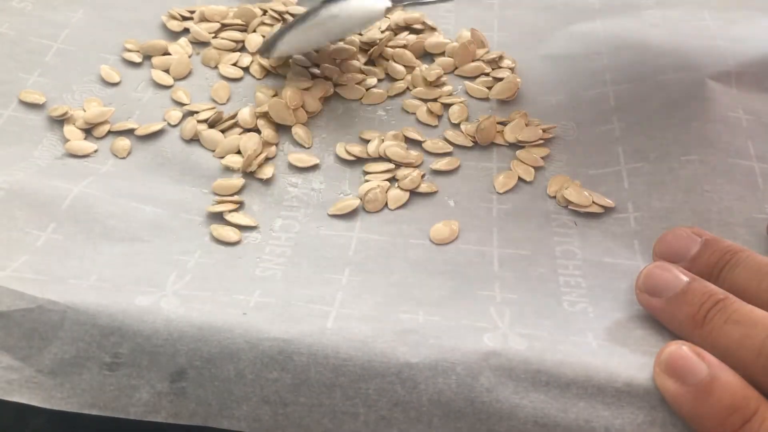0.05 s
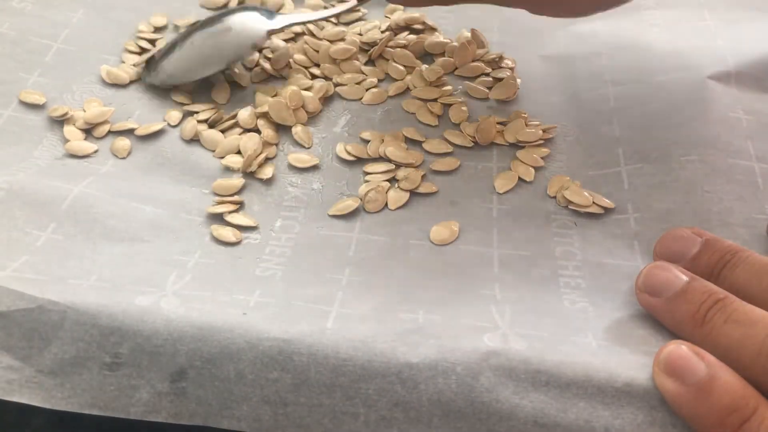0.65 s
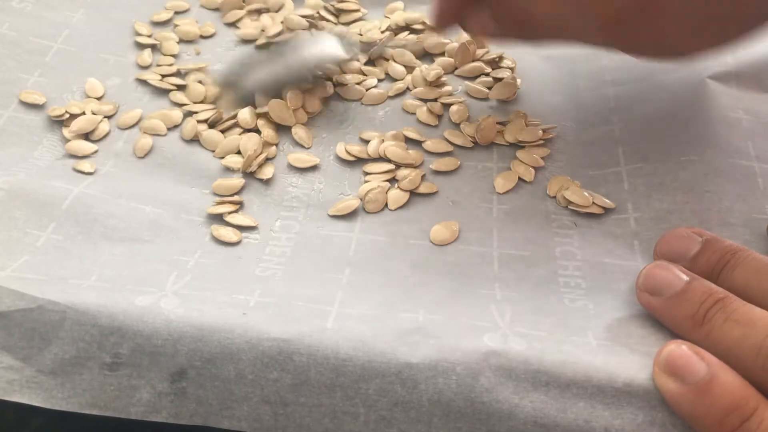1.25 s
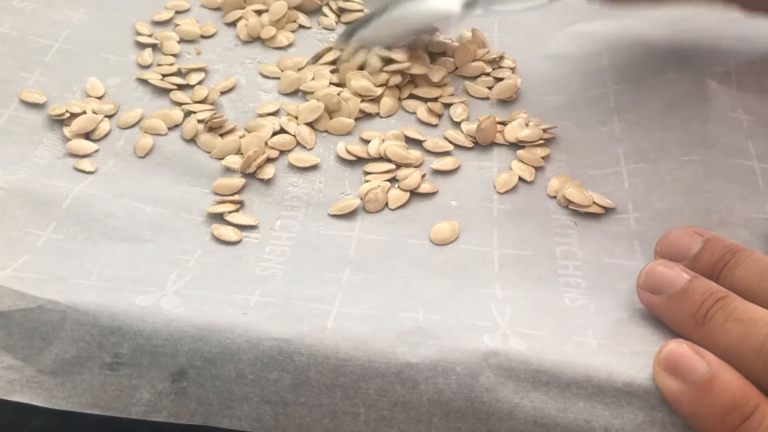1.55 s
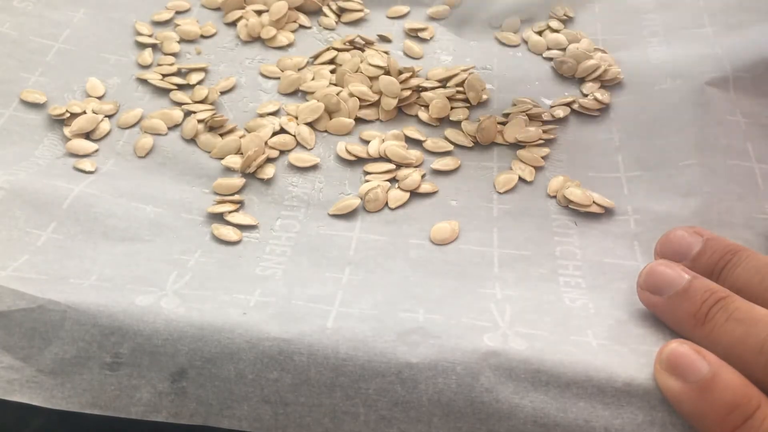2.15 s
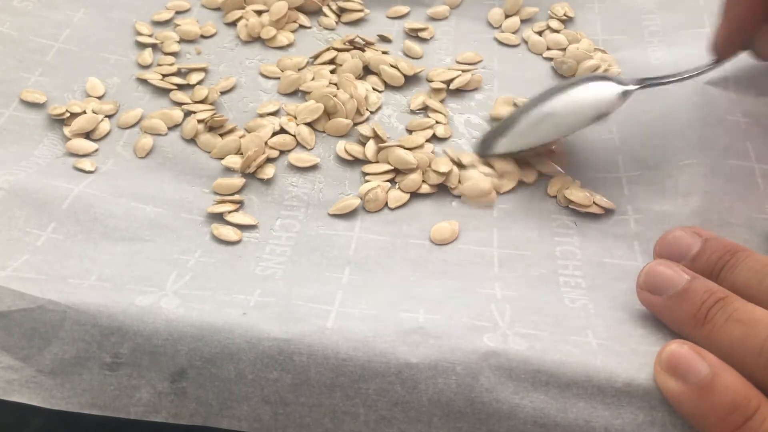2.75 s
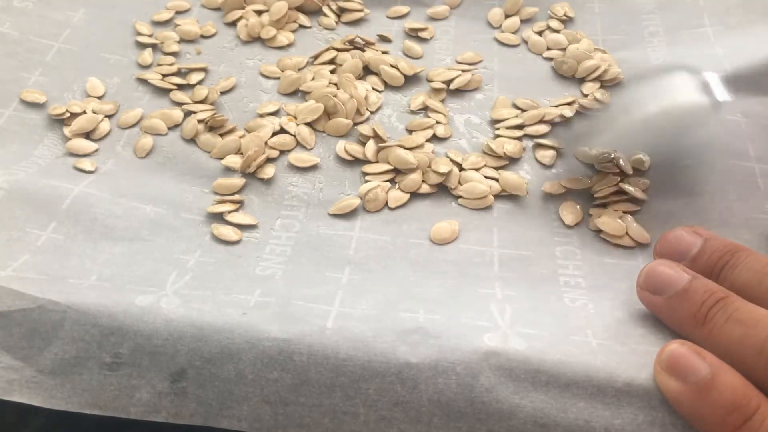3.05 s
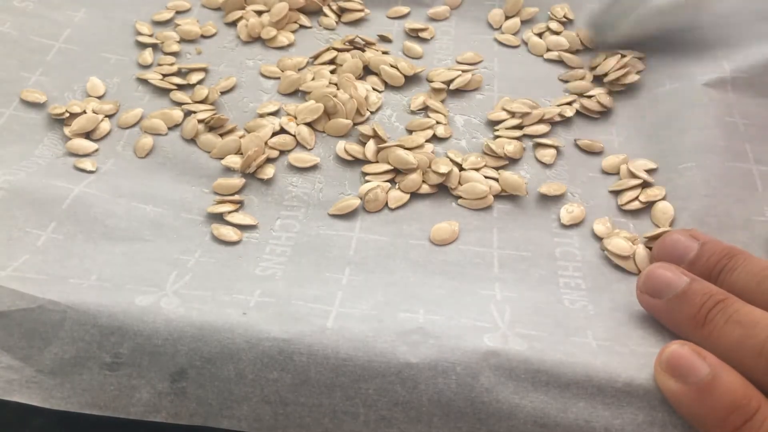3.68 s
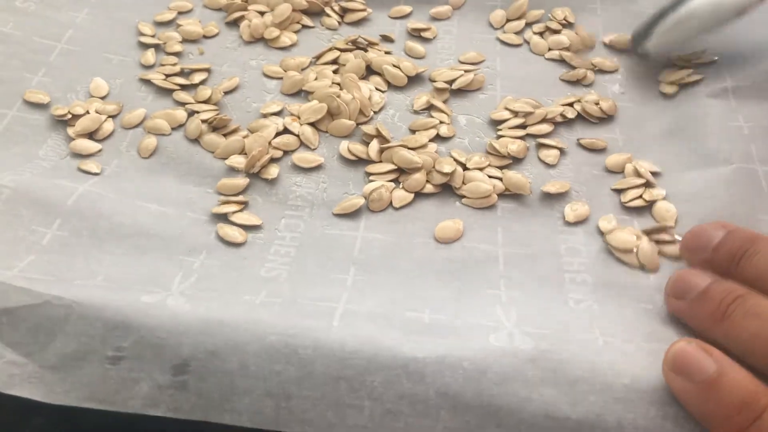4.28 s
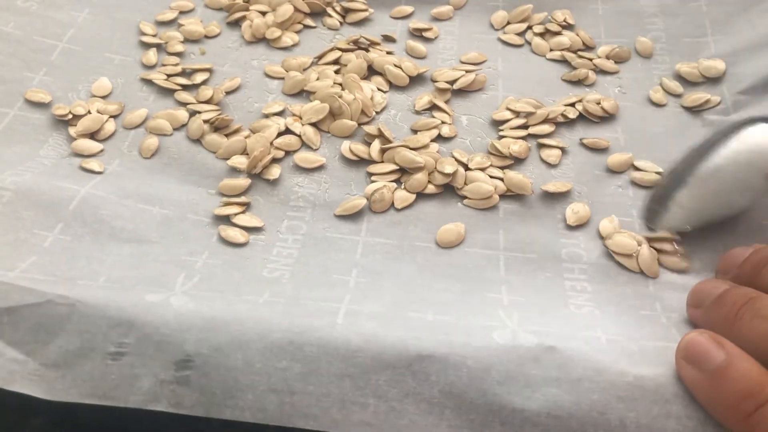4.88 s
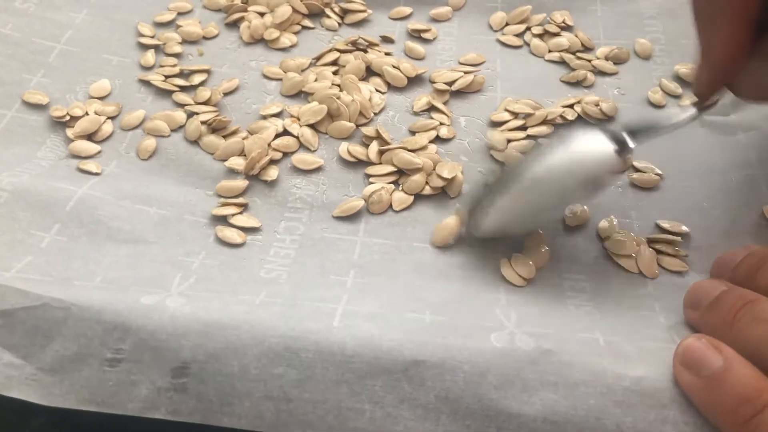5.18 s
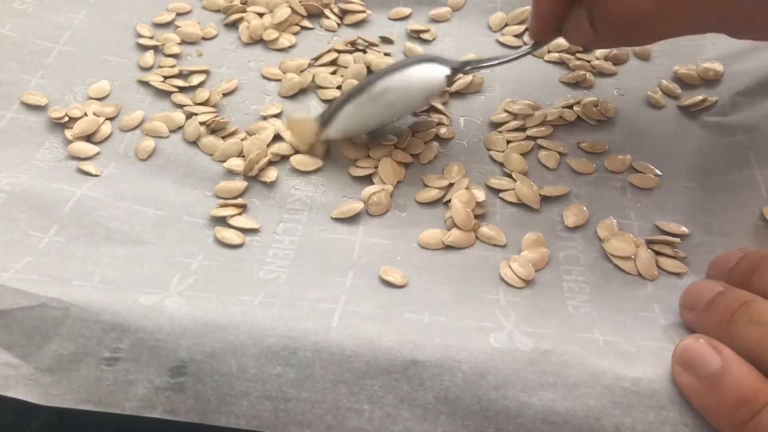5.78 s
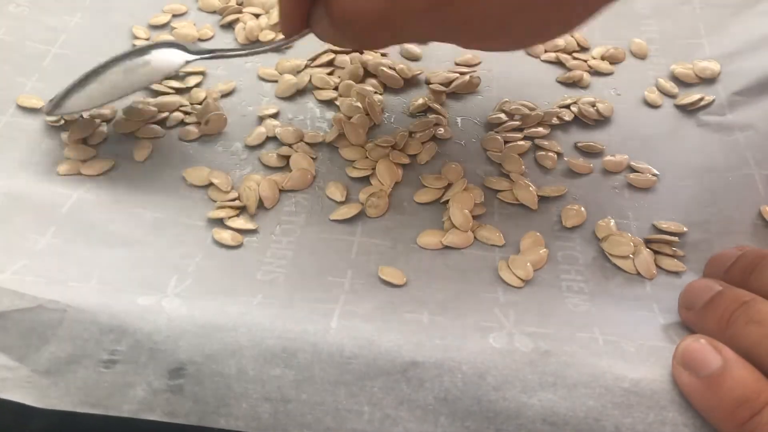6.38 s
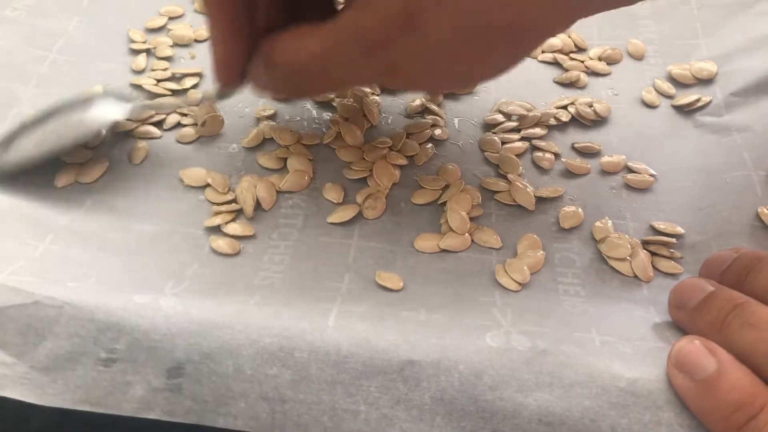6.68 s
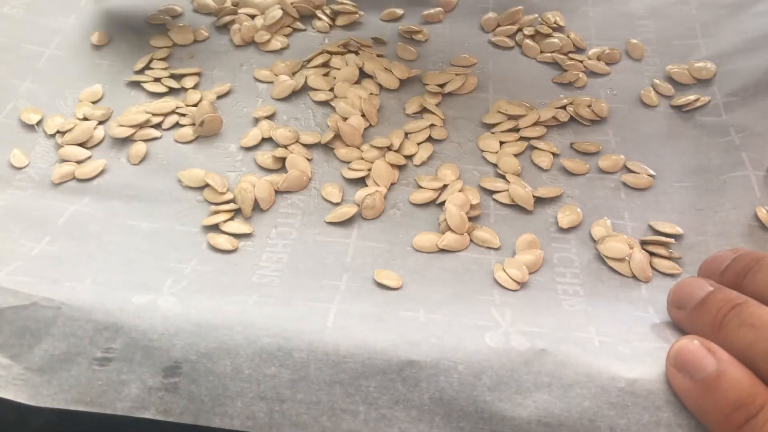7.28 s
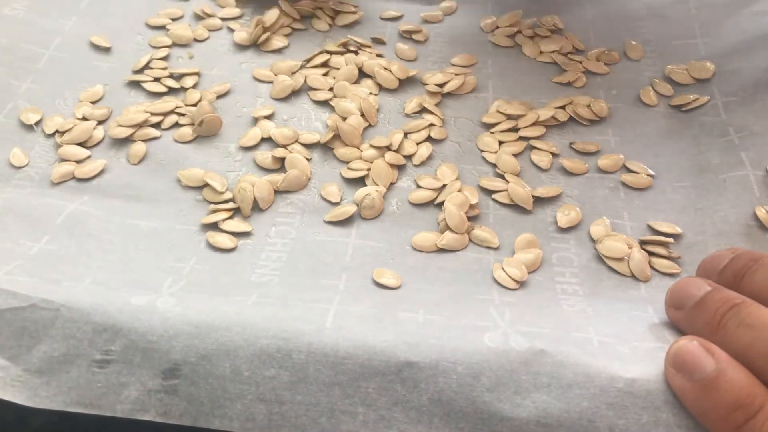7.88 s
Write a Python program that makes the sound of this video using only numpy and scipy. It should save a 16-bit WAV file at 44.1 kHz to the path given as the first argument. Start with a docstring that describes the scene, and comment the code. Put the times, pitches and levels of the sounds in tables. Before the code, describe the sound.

A steel spoon spreads pumpkin seeds over a paper-lined metal pan, with irregular clacking knocks, dry rattles and rustles.

```python
"""A small kitchen, close on a metal pan lined with baking paper: a steel spoon spreads pumpkin seeds.
Short strokes set the seeds rattling on the pan and rustling over the paper; single husks snap, the
steel squeaks, and faint, thin, high pings sound now and then. Up front the spoon knocks on the pan
through the seeds, each knock a burst of tiny contacts that clacks, crackles and rings the damped metal.
Underneath sit soft bumps of the pan on the counter, the room's reverb and an appliance's faint hum."""
import sys
import numpy as np
from scipy import signal
from scipy.fft import rfft, irfft, next_fast_len
from scipy.io import wavfile
from scipy.ndimage import map_coordinates

SR = 44100
rng = np.random.default_rng(int(sys.argv[2]) if len(sys.argv) > 2 else 0)


def digitize_waveform(pressure):
    """Quantize a signal to 16-bit integers and store it at the path in sys.argv[1].

    Rows of a 2-D input are taken as channels; values are limited to [-1, 1].
    """
    field = np.atleast_2d(pressure).T
    bounded = np.clip(field, -1, 1)
    quanta = np.round(bounded * 32767).astype(np.int16)
    wavfile.write(sys.argv[1], SR, quanta)


N = 354563

# The appliance's hum. Each row: frequency in Hz, rms level in dB.
HUM_PARTIALS = [(240.4, -58), (120.2, -71)]
# The kitchen's reverb. Each row: frequency in Hz, time to fall 60 dB (t60) in seconds.
ROOM_DECAY = [(150, 0.34), (500, 0.6), (1400, 0.97), (3500, 0.6), (7000, 0.67), (14000, 0.44)]

# Tone colours. Each row: frequency in Hz, relative level in dB.
AIR_EQ = [(25, -29), (50, -10), (80, -6.5), (120, -13), (160, -13.5), (230, -6.5), (300, -9), (480, -17.5),
          (700, -17), (950, -16.5), (1300, -19.5), (2500, -28), (6000, -39), (16000, -52)]  # room tone
BUMP_EQ = [(25, -22), (55, 8), (95, 10), (150, -2), (300, -31)]  # the pan rocking
THUD_EQ = [(25, -39), (60, -9), (130, 3), (210, -3), (330, -4), (800, -19.5)]  # the pan's feet under a knock
RATTLE_EQ = [(100, -9), (300, -4.5), (550, -5.5), (720, -3), (850, -4.5), (1000, 0), (1500, -5),
             (2300, 0.5), (3200, -1), (4200, -1.5), (5500, -3.5), (7500, -29), (12000, -27)]  # seeds tumbling on the pan
RUSTLE_EQ = [(1200, -34), (2800, 5.5), (6000, 1.5), (8300, 1.5), (10300, -1), (12500, 2.5), (16000, -0.5)]  # seeds sliding on paper
CRACKLE_EQ = [(3000, -12), (6000, 3.5), (8300, 5), (10300, 0.5), (12500, 1.5), (16000, -1)]  # dry husks
CLACK_EQ = [(700, -18), (1300, -8.5), (1800, 3), (2900, 1.5), (4100, 2.5), (5200, -1.5), (7000, -11),
            (10000, -38.5)]  # steel on seed
RING_EQ = [(150, -37), (400, -21.5), (640, -9), (830, -4), (1000, 0), (1350, 5.5), (1700, -10.5),
           (2600, -40)]  # the damped pan

# The pan's resonances. Each row: centre in Hz, width in Hz, gain in dB.
PAN_MODES = [(912, 63, 2), (1124, 150, -12.5), (1340, 60, -11.5), (1721, 123, -6.5), (1975, 163, -4.5),
             (2398, 36, -1.5), (2680, 50, -7.5), (3500, 350, -6), (4257, 77, -1.5), (6520, 50, -5)]
# The tones of one ping. Each row: frequency in Hz, relative level in dB, t60 in seconds.
PING_PARTIALS = [(5873, 0, .16), (10050, -10, .05), (14980, -6, .04)]

# The pan rocks on the counter. Each row: start in seconds, level in dB.
PAN_BUMPS = [(0.252, -39), (0.79, -38), (5.399, -34.5), (6.55, -39), (7.906, -38), (7.965, -43)]
# Faint, thin, high pings. Each row: start in seconds, level in dB.
THIN_PINGS = [(0.197, -40), (1.254, -36), (6.012, -39), (7.064, -48)]
# Steel catches on paper. Each row: start in seconds, pitch in Hz, level in dB, t60 in seconds.
SPOON_SQUEAKS = [(6.557, 960, -16, 0.029), (7.254, 1705, -17.5, 0.084), (7.255, 1210, -37, 0.098)]
# Single husks snap. Each row: start in seconds, level in dB, relative level of the bright edge in dB.
HUSK_SNAPS = [(0.197, -32.5, -1), (0.397, -17, -10), (0.4285, -19.5, -21), (0.604, -34.5, 4),
              (0.737, -28.5, -29), (1.905, -32, -22), (2.189, -21, -13), (2.5443, -19, -10),
              (2.728, -39, -8), (2.768, -22, -27), (3.915, -22, -12), (4.1002, -22, -4.5),
              (4.2197, -22, -6.5), (4.23, -19.5, -15), (4.418, -23, -10), (4.4583, -16, -8),
              (4.6163, -31.5, 17), (4.657, -1.5, -8), (4.6636, -4, -2.5), (4.7006, -6, -11),
              (4.726, -18, 0.5), (4.901, -26, -11), (5.1184, -24, -12), (5.554, -26.5, -10),
              (5.9434, -19, -18), (6.3092, -27, -9), (6.4209, -15.5, -6.5), (6.6106, -14, -4.5),
              (6.6614, -17, -14), (6.8151, -8.5, -3), (7.9833, -10.5, -8)]
# The spoon shoves seeds along. Each row: start in seconds, length in seconds, rattle level in dB,
# rustle level in dB, swell from start to end in dB.
SEED_STROKES = [(0.0, 0.096, -50, -47.5, -1), (0.222, 0.11, -43.5, -52, 10),
                (0.367, 0.13, -46.5, -48, -4.5), (0.524, 0.032, -50, -62, -8),
                (0.572, 0.078, -55.5, -47, 5), (0.673, 0.072, -48.5, -50.5, -7),
                (0.774, 0.066, -57.5, -58, 4), (0.863, 0.076, -46.5, -43.5, 0),
                (1.106, 0.097, -46.5, -46.5, -8), (1.243, 0.061, -41.5, -48.5, 10),
                (1.32, 0.058, -30, -33.5, -2), (1.416, .15, -39, -43.5, 3), (1.56, 0.092, -48.5, -47, -4),
                (1.705, 0.029, -40, -41.5, 2), (1.732, 0.11, -37.5, -45.5, 2), (1.872, .19, -39, -37, 1.5),
                (2.093, 0.014, -45, -40.5, -4), (2.367, 0.04, -40.5, -45.5, 3),
                (2.587, 0.051, -40.5, -42, -2.5), (2.658, 0.035, -72, -50, -5),
                (2.775, 0.069, -37, -39, -7), (2.984, 0.088, -48.5, -42, -16),
                (3.597, 0.035, -32.5, -41, 2), (3.997, 0.019, -37, -30.5, 19),
                (4.456, 0.014, -30.5, -22.5, 2), (4.519, 0.24, -37, -41, 7.5), (5.02, 0.12, -52, -46, -2),
                (5.371, 0.078, -35.5, -38.5, 16), (5.806, 0.061, -33.5, -44, -2),
                (6.013, 0.048, -31.5, -35, 8.5), (6.097, 0.064, -69, -48, -2),
                (6.172, 0.062, -30, -36.5, 3), (6.334, 0.024, -44, -33.5, 4), (6.518, .09, -40, -37, 8),
                (6.724, 0.11, -35, -29.5, 6.5), (6.872, 0.14, -56.5, -60, 12),
                (7.056, 0.036, -41, -53.5, 8.5), (7.228, 0.049, -30.5, -43.5, 1),
                (7.421, .012, -23, -26.5, 9.5), (7.699, 0.045, -31.5, -34, 7),
                (7.768, 0.058, -42.5, -50, -2), (7.895, 0.1, -31, -37, 4), (8.03, 0.023, -39, -36.5, 5)]
# The spoon lands on the pan. Each row: start in seconds, level in dB, ring trim in dB,
# crackle trim in dB, t60 of the clack in seconds, the thud's own level in dB.
SPOON_KNOCKS = [(0.2355, -37, -17, -0.5, 0.14, -43), (0.8858, -28, -33, -22, 0.33, -47),
                (1.089, -34.5, 2.5, -24, 0.14, -47), (1.1195, -26.5, -9, -33, 0.12, -47),
                (1.3151, -16.5, -9, -18, 0.28, -49), (2.0305, -17.5, -8.5, -27, 0.14, -48),
                (2.975, -18, -14, -10.5, 0.09, -56), (3.1786, -17.5, -11.5, -16.5, 0.12, -37.5),
                (3.3807, -6, -7.5, -19, .11, -36.5), (3.6022, -21, 5, -21, 0.03, -33),
                (3.6213, -17.5, 1.5, -32, 0.066, -38), (3.6396, -13, 3.5, -37, 0.069, -43),
                (3.8054, -1, -13.5, -14.5, .1, -33), (4.022, -3.5, -11.5, -13.5, .13, -40),
                (4.2717, -0.5, -8.5, -14, .13, -35.5), (4.47, -15.5, -10, -28, 0.17, -38),
                (4.6769, -12.5, -9, -17, 0.088, -43), (4.9331, -2, -12, -14, .13, -31),
                (5.195, -2, -10.5, -13, .13, -31), (5.6102, -1.5, -9, -15, .11, -31),
                (5.8188, -18.5, -2.5, -19, 0.093, -31.5), (5.8988, -21.5, -13, -38.5, 0.099, -46),
                (6.0383, -18.5, -0.5, -17.5, 0.097, -38), (6.1702, -7.5, -5, -24, 0.1, -37),
                (6.3335, -9, -9, -22, 0.12, -38), (6.5226, -22.5, -9, -16, 0.14, -37.5),
                (6.7278, -20, -21, -15, 0.19, -40.5), (7.2324, -19, -5.5, -14, 0.15, -39),
                (7.2556, -22, 2, -31, 0.099, -59), (7.429, -4, -5, -35, 0.099, -37.5),
                (7.747, -16.5, -40, -7.5, 0.11, -41), (7.9068, -18, 1, -24, 0.085, -36)]

AIR_DB, TOP_HZ = -54.5, 16100
STROKE_ATTACK_S, STROKE_T60_S = 0.0032, 0.092  # the spoon meets the seeds; they roll on after it
CLUMP_DB, CLUMPS_PER_S = 2, 64  # seeds jam and give way
RATTLE_FADE_DB = -4  # over a stroke the seeds tumble less and slide more
SNAP_T60_S, EDGE_T60_S, THUD_T60_S = .04, .017, 0.16
SNAP_CREST_DB, KNOCK_CREST_DB = 13, 6.5  # headroom for peaks over rms
SCRUNCH_DB, SCRUNCH_LEAD_S = -21.5, 0.0063  # the top seeds give way just before the spoon lands


def amp(db):
    """Decibels to gain."""
    return 10 ** (np.asarray(db) / 20)


def unit(x):
    """Scale to rms 1."""
    return x / np.sqrt(np.mean(x ** 2) + 1e-20)


def along(points, hz):
    """Read a curve of (Hz, value) points on a log frequency axis."""
    freqs, values = np.transpose(points)
    return np.interp(np.log(hz + 1), np.log(freqs), values)


def wobble(rate):
    """Smooth random modulation, through `rate` points a second."""
    return map_coordinates(rng.standard_normal(int(N * rate / SR) + 4), [np.arange(N) * rate / SR])


def filtered(x, response):
    """Filter x by a gain that is a function of Hz."""
    size = next_fast_len(len(x) + 4096, real=True)
    return irfft(rfft(x, size) * response(np.fft.rfftfreq(size, 1 / SR)), size)[:len(x)]


def coloured(x, eq):
    """Put x through an EQ curve and bring it to rms 1."""
    return unit(filtered(x, lambda hz: amp(along(eq, hz))))


def strike(t, t60, attack):
    """Percussive envelope: rises fast from t = 0 and dies away; times in seconds."""
    t = np.maximum(t, 0)
    return amp(-60 * t / max(t60, 1e-3)) * (1 - np.exp(-t / attack))


def add(track, start, sound):
    """Mix a sound into the track at `start` seconds."""
    part = track[max(round(start * SR), 0):][:len(sound)]
    part += sound[:len(part)]


def contacts(rate, spread_db, size=N):
    """Tiny impacts of random strength, about `rate` a second."""
    happens = rng.random(size) < rate / SR
    polarity = np.sign(rng.standard_normal(size))
    return happens * polarity * amp(spread_db * np.clip(rng.standard_normal(size), -2, 2))


def room_tone():
    """The bed: still kitchen air and an appliance's faint, slightly wavering hum."""
    t = np.arange(N) / SR
    sway_db, drift = .7 * wobble(3), .15 * wobble(3)
    hum = sum(amp(db + sway_db) * np.sqrt(2) * np.sin(2 * np.pi * hz * t + drift)
              for hz, db in HUM_PARTIALS)
    air = amp(AIR_DB + 1.7 * wobble(4.25)) * coloured(rng.standard_normal(N), AIR_EQ)
    return hum + air


def kitchen_reverb(x):
    """A dark, diffuse tail, longest in the mids; it changes as hand and spoon move."""
    wet, hop = np.zeros(N), SR // 3  # a fresh tail every third of a second
    hz, t, noise = signal.stft(rng.standard_normal((N // hop + 1, SR // 2)), SR, nperseg=256)
    decay = amp(-60 * t / along(ROOM_DECAY, hz)[:, None])
    tails = signal.istft(noise * decay, SR, nperseg=256)[1]
    tails *= 1 - np.exp(-np.arange(tails.shape[1]) / SR / 0.00088)  # soften the onset
    for start, tail in zip(range(0, N, hop), tails):
        add(wet, start / SR, signal.fftconvolve(x[start:start + hop], tail / np.linalg.norm(tail)))
    return filtered(wet, lambda f: amp(along([(300, 2.5), (1200, -4.5), (4000, -7.5), (12000, -7.5)], f)))


def pan_bumps():
    """The pan rocks on the counter: dull lows with a soft attack."""
    track, t = np.zeros(N), np.arange(SR // 3) / SR
    for start, db in PAN_BUMPS:
        rumble = coloured(rng.standard_normal(len(t)), BUMP_EQ)
        add(track, start, amp(db) * rumble * strike(t, 0.13, attack=0.0075))
    return track


def thin_pings():
    """Faint, thin, high pings: three sine tones that die away quickly."""
    track, t = np.zeros(N), np.arange(SR // 4) / SR
    ping = sum(amp(db) * np.sin(2 * np.pi * hz * t) * strike(t, t60, attack=0.00042)
               for hz, db, t60 in PING_PARTIALS)
    for start, db in THIN_PINGS:
        add(track, start, amp(db) * ping)
    return track


def settling_seeds(knocks):
    """After a knock, loosened seeds go on ticking softly as they come to rest."""
    pole = np.exp(-1 / (.15 * SR))
    unrest = np.sqrt(signal.lfilter([1 - pole], [1, -pole], knocks ** 2))  # envelope follower
    t = np.arange(SR // 50) / SR
    tick = rng.standard_normal(len(t)) * strike(t, 0.034, attack=0.00042)
    ticks = signal.fftconvolve(contacts(rate=70, spread_db=3), tick)[:N]
    return amp(-26) * unrest * (coloured(ticks, RATTLE_EQ) + 0.2 * coloured(ticks, RUSTLE_EQ))


def spoon_squeaks():
    """The steel sticks and slips on the paper: brief, unsteady tones."""
    track, t = np.zeros(N), np.arange(SR // 4) / SR
    for start, hz, db, t60 in SPOON_SQUEAKS:
        pitch = hz * (1 + 0.03 * wobble(214)[:len(t)])
        squeak = np.sin(2 * np.pi * np.cumsum(pitch) / SR)
        add(track, start, amp(db) * squeak * strike(t, t60, attack=0.0019))
    return track


def husk_snaps():
    """A husk slips from under the steel: a dry click with a midrange body and a bright edge."""
    track, t = np.zeros(N), np.arange(SR // 10) / SR
    for start, db, edge_db in HUSK_SNAPS:
        body = coloured(rng.standard_normal(len(t)), CLACK_EQ) * strike(t, SNAP_T60_S, attack=0.000098)
        edge = coloured(rng.standard_normal(len(t)), CRACKLE_EQ) * strike(t, EDGE_T60_S, attack=0.00078)
        add(track, start, amp(db) * (amp(-SNAP_CREST_DB) * body + amp(edge_db) * edge))
    return track


def through_pan(x, direct_db, scatter_db):
    """Impacts heard direct and through the metal, whose modes depend on where the spoon presses."""
    chance = rng.standard_normal((len(PAN_MODES), 2))
    modes = [(hz * (1 + 0.025 * detune), width, db + scatter_db * lift)
             for (hz, width, db), (detune, lift) in zip(PAN_MODES, chance)]
    sheet = lambda f: sum(amp(db) * 1j * f * width / (hz * hz - f * f + 1j * f * width)
                          for hz, width, db in modes)
    return filtered(x, lambda f: amp(direct_db) + sheet(f))


def seed_clacks(count, centre_hz, spread, cycles, spread_db):
    """Seeds knock together: short grains, each at a pitch of its own; rms 1."""
    detune, strength = np.hsplit(np.clip(rng.standard_normal((count, 2)), -2, 2), 2)
    starts = ((np.arange(count) + 3 * rng.random(count)) * N / count).astype(int)
    n = np.arange(SR // 40)
    phase = centre_hz * np.exp(spread * detune) * n / SR
    grains = amp(spread_db * strength) * np.sin(2 * np.pi * phase) * np.exp(-phase / cycles)
    return unit(np.bincount((starts[:, None] + n).ravel(), grains.ravel(), N)[:N])  # overlap and add


def shove(t, length, swell_db):
    """Envelope of a stroke: a quick start, a push that swells or fades evenly, the seeds rolling out."""
    progress = np.minimum(t / length, 1)
    roll_out_db = -60 * np.maximum(t - length, 0) / STROKE_T60_S
    return (1 - np.exp(-t / STROKE_ATTACK_S)) * amp(swell_db * (progress - .5) + roll_out_db)


def seed_strokes():
    """Pushed seeds tumble on the pan and slide over the paper, in clumps."""
    t = np.arange(SR // 2) / SR
    on_pan, on_paper = np.zeros((2, N))
    for start, length, rattle_db, rustle_db, swell_db in SEED_STROKES:
        add(on_pan, start, amp(rattle_db) * shove(t, length, swell_db + RATTLE_FADE_DB))
        add(on_paper, start, amp(rustle_db) * shove(t, length, swell_db))
    tumble = through_pan(contacts(rate=1800, spread_db=4), direct_db=-8, scatter_db=1)
    clacks = seed_clacks(count=1300, centre_hz=2800, spread=.45, cycles=15, spread_db=4.5)
    rattle = .78 * coloured(tumble, RATTLE_EQ) + .63 * clacks
    rustle = coloured(contacts(rate=6100, spread_db=4), RUSTLE_EQ)
    return (rattle * on_pan + rustle * on_paper) * amp(CLUMP_DB * wobble(CLUMPS_PER_S))


def spoon_knocks():
    """The spoon hits a layer of seeds: contacts clack, husks crackle, the pan rings and its feet thud."""
    track, size = np.zeros(N), SR // 4
    t = np.arange(size) / SR - .02  # pre-roll for the scrunch
    for start, db, ring_db, crackle_db, t60, thud_db in SPOON_KNOCKS:
        burst = through_pan(contacts(rate=9000, spread_db=3, size=size), direct_db=-7.5, scatter_db=2.3)
        clack, ring = coloured(burst, CLACK_EQ), coloured(burst, RING_EQ)
        crackle = coloured(contacts(rate=9000, spread_db=6.5, size=size), CRACKLE_EQ)
        thud = coloured(rng.standard_normal(size), THUD_EQ) * strike(t, THUD_T60_S, attack=.005)
        hit = clack * strike(t, t60, attack=0.001)
        hit += amp(ring_db) * ring * strike(t, t60 * 1.04, attack=0.00026)
        hit += amp(crackle_db + 3) * crackle * strike(t, t60 * 1.06, attack=0.0001)
        scrunch = (clack + crackle) * strike(t + SCRUNCH_LEAD_S, 0.032, attack=0.0036)
        knock = amp(db - KNOCK_CREST_DB) * hit + amp(db + SCRUNCH_DB) * scrunch + amp(thud_db) * thud
        add(track, start + t[0], knock)
    return track


def scene():
    """The mix, dead centre: knocks and seeds with a reverb send, over the bumps and the room tone."""
    knocks = spoon_knocks()
    texture = seed_strokes() + husk_snaps() + thin_pings() + spoon_squeaks() + settling_seeds(knocks)
    reverb = kitchen_reverb(amp(-10) * knocks + amp(-9) * texture)
    mono = knocks + texture + reverb + pan_bumps() + room_tone()
    return np.array([mono, mono])


def record(dry):
    """Soft-clip the loudest peaks at full scale, then cut the deep bass and the very top."""
    rounded = dry / (1 + dry ** 6) ** (1 / 6)
    low_cut = lambda hz: hz ** 2 / np.sqrt(hz ** 4 + 35 ** 4)
    passband = lambda hz: low_cut(hz) / np.sqrt(1 + (hz / TOP_HZ) ** 200)
    return np.array([filtered(channel, passband) for channel in rounded])


dry = scene()
out = record(dry)
digitize_waveform(out)
```